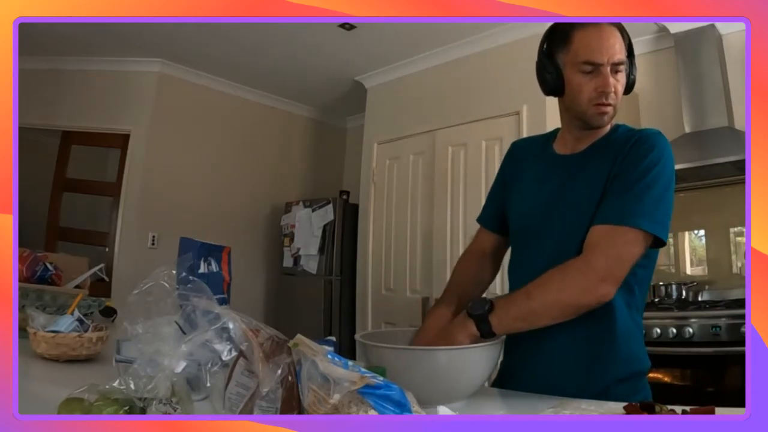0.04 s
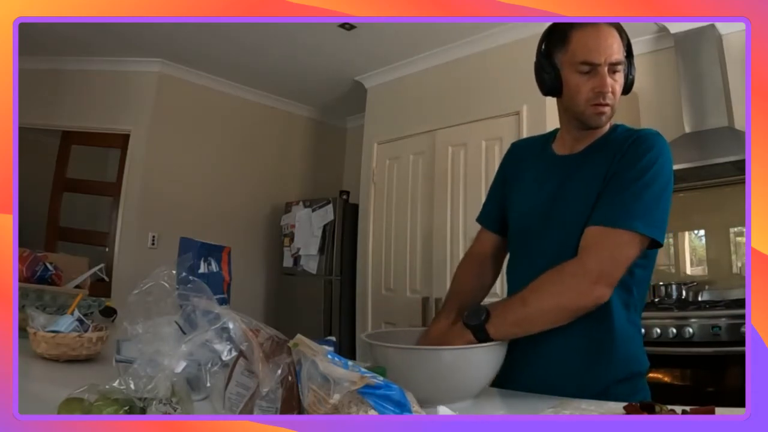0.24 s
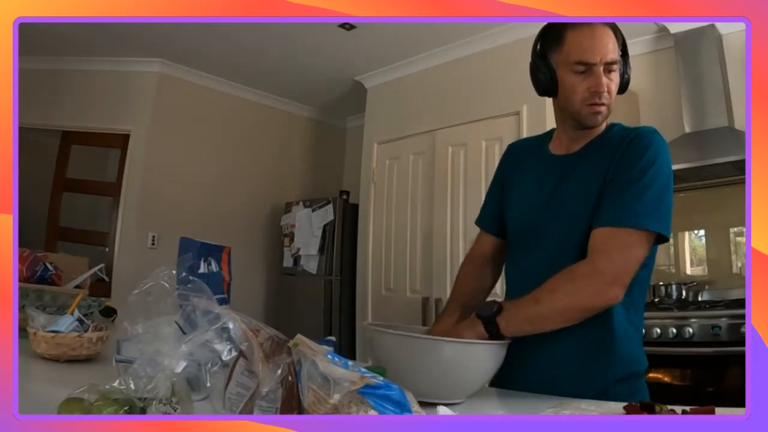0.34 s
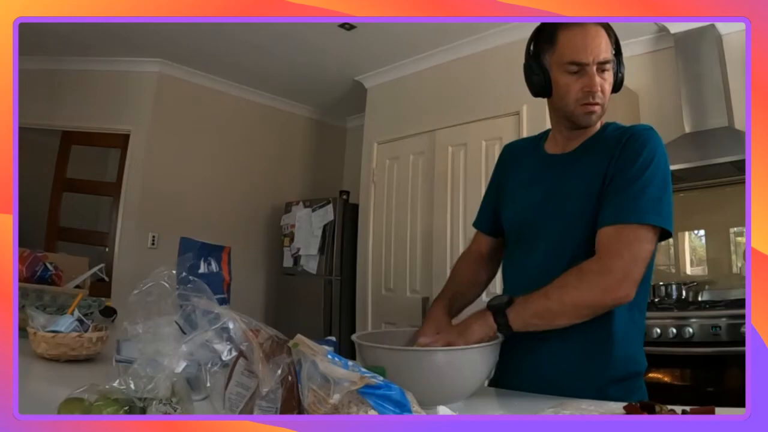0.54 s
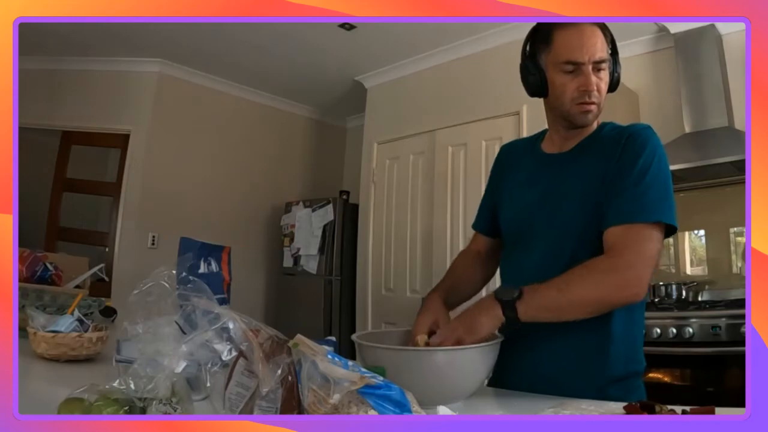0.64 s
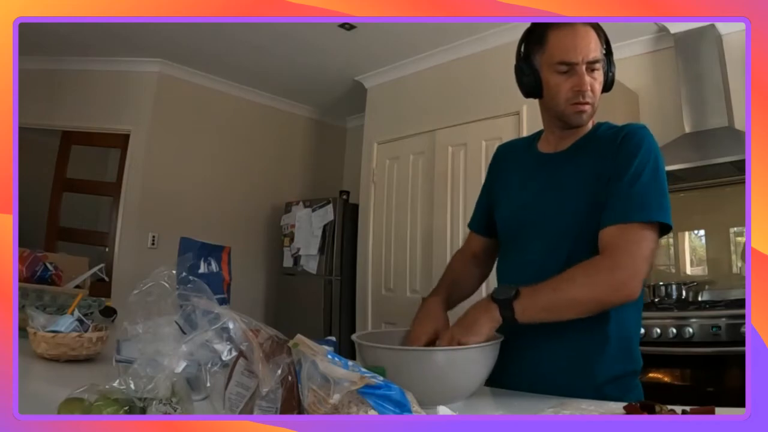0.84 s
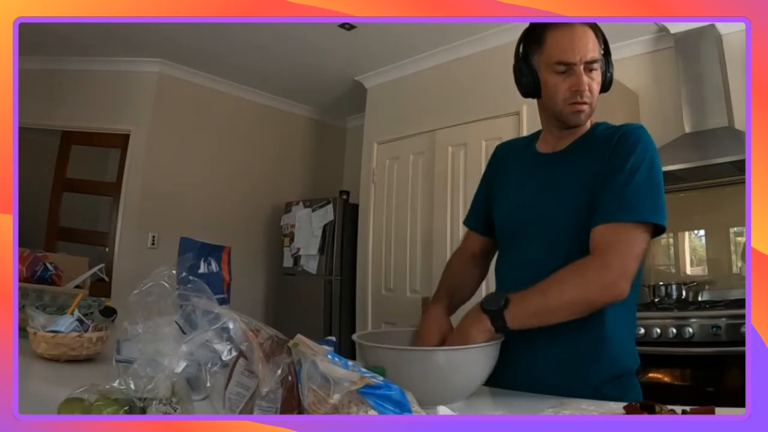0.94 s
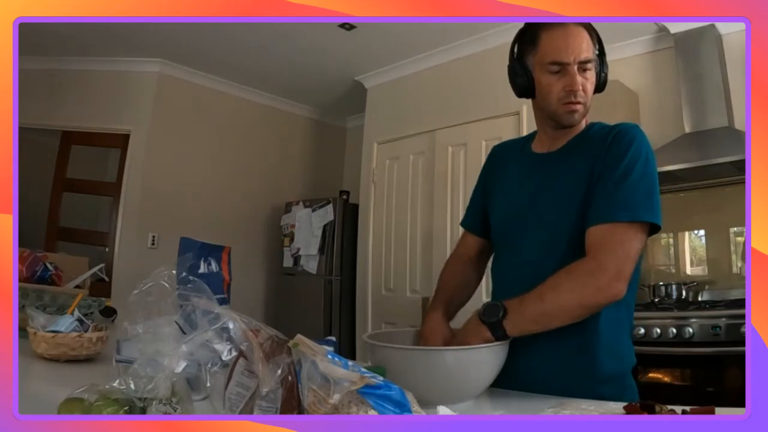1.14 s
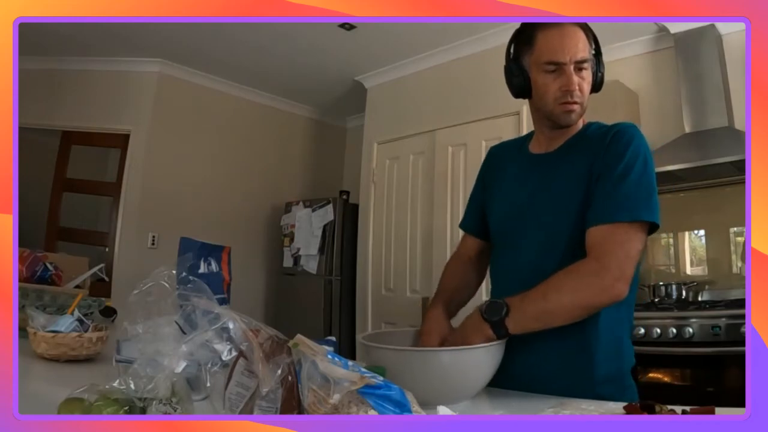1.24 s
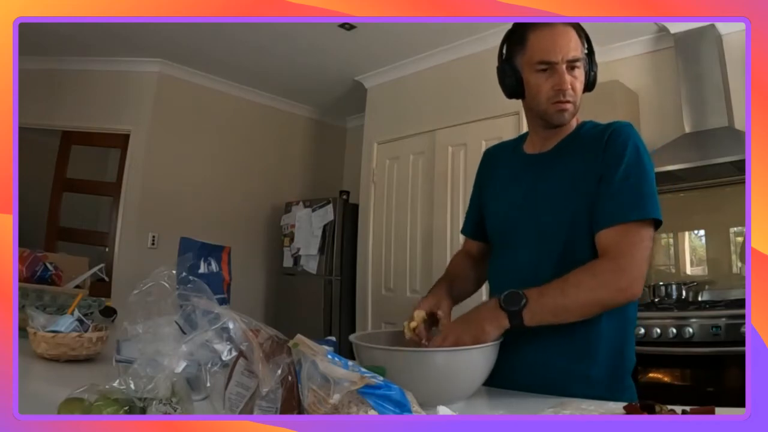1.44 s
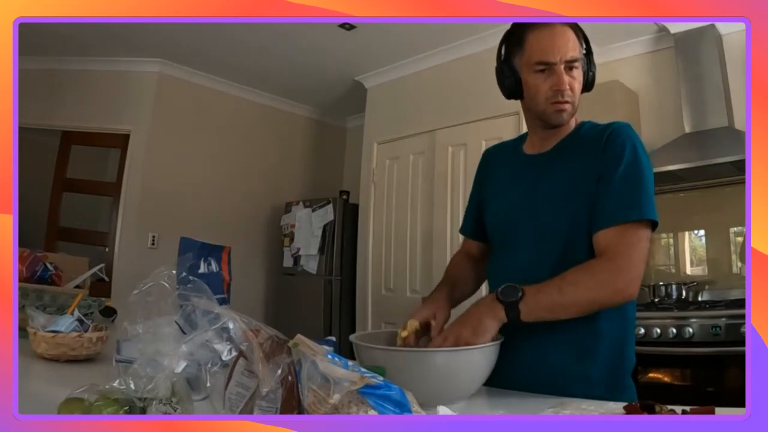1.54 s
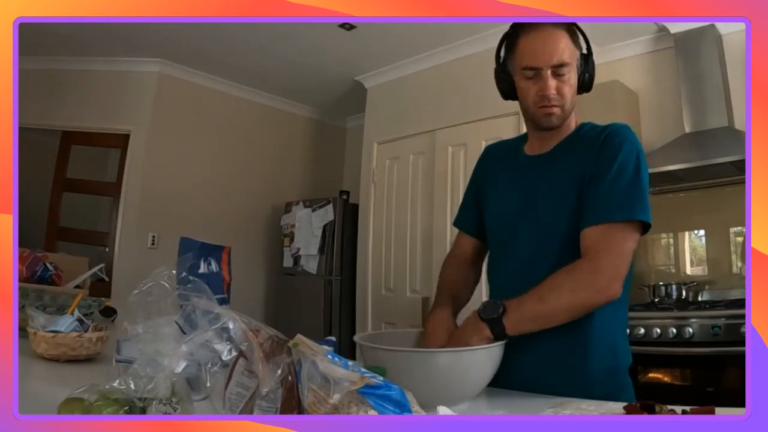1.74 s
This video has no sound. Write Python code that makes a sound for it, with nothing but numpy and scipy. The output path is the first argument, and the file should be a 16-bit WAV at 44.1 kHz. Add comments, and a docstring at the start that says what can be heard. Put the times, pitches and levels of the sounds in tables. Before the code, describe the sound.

A mixing bowl knocks on a kitchen counter while hands work dough. After a faint scrape, a woody thud lands at 0.23 seconds, then the loudest, sharp rattling knock at 0.39, slightly overloaded. A faint tap follows at 0.6, brief scrapes near 0.8 and 1.05, a dull damped thump at 1.13, and tiny taps and rubbing around 1.5. Hard-room reflections, low hum and hiss; narrow-band small microphone.

```python
"""A faint scrape is heard first, over hum and hiss; then hands work dough in a bowl on a kitchen counter.
The bowl knocks: a noise crack, damped modes of counter and cupboard, a low thump and a noisy rattle.
Fingers and bowl scrape faintly: random friction grains pass through broad resonances.
Decaying noise gives the hard room's reflections; appliance tones are narrowly filtered noise.
A small microphone a little way off has a narrow band and overloads on the hardest knock."""
import sys
import numpy as np
from scipy import signal
from scipy.fft import rfft, irfft
from scipy.io import wavfile
from scipy.ndimage import uniform_filter1d

SR = 44100
rng = np.random.default_rng(int(sys.argv[2]) if len(sys.argv) > 2 else 0)


def digitize_waveform(pressure):
    """Quantize a signal to 16-bit integers and store it at the path in sys.argv[1].

    Rows of a 2-D input are taken as channels; values are limited to [-1, 1].
    """
    field = np.atleast_2d(pressure).T
    bounded = np.clip(field, -1, 1)
    quanta = np.round(bounded * 32767).astype(np.int16)
    wavfile.write(sys.argv[1], SR, quanta)


def decibels_to_gain(level_db):
    """Convert a level in decibels to a linear amplitude gain (20 dB per decade)."""
    exponent = np.asarray(level_db, float) / 20
    return 10 ** exponent


N = 79380  # samples, 1.8 s

# Levels in all tables are those of the parts, before mixing and recording.
# Spectrum of room hum and microphone hiss: frequency_hz, relative_level_db
FLOOR_SPECTRUM = [(24, -66), (40, -30.5), (90, -6.5), (208, -1.5), (758, -9), (810, -24), (865, -9.5),
                  (1280, -13.5), (1630, -14), (3680, -18.5), (4020, -25), (6240, -11.5), (7600, -11),
                  (9880, -60), (16700, -120)]
# Wavering appliance tones: frequency_hz, width_hz (of each of two filter passes), level_db
HUM_TONES = [(140, 5.6, -74), (645, 18, -74), (980, 40, -71.5)]
# Decay time of the room's reflections: frequency_hz, t60_s
ROOM_DECAY = [(100, 0.19), (250, 0.5), (500, 0.64), (1000, 0.43), (2000, 0.56), (4000, 0.61), (7000, 0.63)]
# Strokes of fingers and bowl: start_s, stop_s, final_level_db, swell_db (negative fades),
# tilt_db_per_octave, bowl_tones_db
STROKES = [(-.06, 0.011, -49, -15, -2.5, -17), (0.324, 0.383, -41, 4.5, -4.5, -8.5),
           (0.767, 0.892, -42.5, 23, 0, -15), (0.996, 1.124, -52, 5.5, 4.5, -16.5),
           (1.5, 1.61, -58.5, 2, -4.5, -3)]
# Spectrum of the rubbing: frequency_hz, relative_level_db
RUB_SPECTRUM = [(300, -41), (1200, -24), (1700, -3), (2500, 0), (3400, -6.5), (4500, -10), (5500, -8),
                (6700, -1.5), (7500, -13.5)]
# Bowl tones under a stroke: frequency_hz, width_hz, relative_level_db
BOWL_TONES = [(1080, 73, -7.5), (1950, 200, -2), (3040, 150, -3)]
# Blows of the bowl on the counter: start_s, thud_db, thump_db, rattle_db, crack_db,
# thud_centre_hz, thud_rise_s, hand_damping_db_per_s (the thud takes only a share of it)
BLOWS = [(.234, -13, -19, -23, -36.5, 451, 0.0063, 4.5), (.292, -30, -35, -31, -46, 520, .008, 8),
         (0.348, -26, -31, -36.5, -60, 350, 0.031, 9.5), (0.3921, -9, -22, -12, -4.5, 763, .003, 6),
         (.61, -46, -65, -42.5, -48.5, 600, 0.0055, 5), (1.127, -18.5, -14.5, -30, -24, 505, 0.015, 75),
         (1.213, -37, -47.5, -57, -61, 560, 0.002, 30), (1.477, -45.5, -74, -64, -60, 543, 0.0051, 53),
         (1.492, -50, -59, -59, -66, 287, 0.0051, 78)]
# Modes of the counter and the cupboard under it: frequency_hz, relative_level_db, t60_s
COUNTER_MODES = [(128, -15.5, .3), (263.2, -5.5, .3), (308, -12, 0.42), (339.3, 3, .3), (390.6, -6, 0.23),
                 (396, -1.5, 0.26), (447.3, -1.5, 0.36), (521.2, -2, 0.4), (533.4, -2.5, 0.28),
                 (589.4, 0, 0.3), (620, -13, .35), (661.7, -2.5, 0.27), (778.6, -3.5, 0.17),
                 (969, -9, 0.24), (804, -12.5, 0.1), (1040, -5.5, 0.44)]
# Spectrum of the contact crack: frequency_hz, relative_level_db
CRACK_SPECTRUM = [(410, -28.5), (700, 9), (1010, -22.5), (1400, -1.5), (2430, 3), (3260, -6.5), (5190, -14),
                  (6380, -4), (7400, -23), (9620, -70.5), (16300, -120)]
# The counter's dense small resonances: frequency_hz, relative_level_db
RATTLE_SPECTRUM = [(60, -52), (120, -16), (300, -3.5), (600, -4), (950, 3), (1290, -12), (1600, -2.5),
                   (2400, -8.5), (3500, -19.5), (5000, -29), (6500, -30), (7400, -39.5)]
# Thin bowl modes in the rattle: frequency_hz, relative_level_db, t60_s
BOWL_MODES = [(1169, -9.5, 0.14), (1413, -8, 0.23), (1535, -16, .35), (1594, -8, 0.48), (1692, -5, .2),
              (1866, -13, 0.23)]


def evened(x):
    """Normalisation: scales a signal to an rms of 1."""
    return x / np.sqrt(np.mean(x ** 2) + 1e-20)


def read(points, hz):
    """Linear interpolation of a table on a log-frequency axis."""
    f, value = np.transpose(points)
    return np.interp(np.log(hz + 1), np.log(f + 1), value)


def add(mix, s, sound):
    """Superposition: sums a sound into the mix at time s, cutting what lies outside."""
    at = round(s * SR)
    sound = sound[max(-at, 0):]
    part = mix[max(at, 0):][:len(sound)]
    part += sound[:len(part)]


def shaped(x, level_db):
    """Linear filtering: weights the spectrum of x by a level at each frequency."""
    return irfft(rfft(x) * decibels_to_gain(level_db), len(x))


def coloured(points, size):
    """Spectral shaping: noise of rms 1 with the tabulated spectrum."""
    hz = np.fft.rfftfreq(size, 1 / SR)
    return evened(shaped(rng.standard_normal(size), read(points, hz)))


def resonate(x, hz, width):
    """Resonance: shifts a tone to zero frequency, smooths and shifts back, with a peak gain of 1."""
    turn = np.exp(2j * np.pi * hz * np.arange(len(x)) / SR)
    r = np.exp(-np.pi * width / SR)
    return 2 * (turn * signal.lfilter([1 - r], [1, -r], x / turn)).real


def dying(x):
    """Reverberant decay: each band of a steady noise dies exponentially at the room's rate."""
    hz, t, z = signal.stft(x, SR, nperseg=512, noverlap=384)
    z = z * decibels_to_gain(-60 * t / read(ROOM_DECAY, hz)[:, None])
    return signal.istft(z, SR, nperseg=512, noverlap=384)[1][:len(x)]


def room(x):
    """Diffuse reflection: convolves with a newly drawn dense tail that builds up after a gap."""
    gap_s, rise_s = 0.012, 0.011
    t = np.arange(SR * 3 // 4) / SR
    tail = dying(rng.standard_normal(len(t))) * np.clip((t - gap_s) / rise_s, 0, 1)
    return signal.fftconvolve(x, tail / np.linalg.norm(tail))


def kitchen():
    """Stationary noise: room hum and microphone hiss, slightly patchy in time and frequency."""
    level_db, patchy_db = -62, 1.8
    hz, t, z = signal.stft(coloured(FLOOR_SPECTRUM, N), SR, nperseg=1024, noverlap=768)
    patches = uniform_filter1d(rng.standard_normal(z.shape), 12, axis=0)
    patches = evened(uniform_filter1d(patches, 10, axis=1))
    noise = signal.istft(z * decibels_to_gain(patchy_db * patches), SR, nperseg=1024, noverlap=768)[1][:N]
    return decibels_to_gain(level_db) * noise


def hum():
    """Narrow-band noise: twice-filtered noise makes the faint fuzzy tones of kitchen appliances."""
    tones = np.zeros(N)
    for hz, width, db in HUM_TONES:
        tone = resonate(rng.standard_normal(N), hz, width)
        tones += decibels_to_gain(db) * evened(resonate(tone, hz, width))
    return tones


def scrape(start, stop, final_db, swell_db, tilt_db, tones_db):
    """Friction: fine grains swell or fade through the bowl's broad resonances and stop short."""
    grains_per_s, grain_db, onset_s = 9000, 1.5, 0.03
    swell_power, stop_db_per_s, room_db = 1.5, 600.5, -12.5
    t = np.arange(SR // 2) / SR
    hz = np.fft.rfftfreq(len(t), 1 / SR)
    present = rng.random(len(t)) < grains_per_s / SR
    grains = rng.standard_normal(len(t)) * present
    grains = grains * decibels_to_gain(grain_db * rng.exponential(1, len(t)))  # a few stronger grains

    tilt = tilt_db * np.log2(np.clip(hz, 500, 7500) / 2500)
    body = evened(shaped(grains, read(RUB_SPECTRUM, hz) + tilt))
    tones = sum(decibels_to_gain(db) * evened(resonate(grains, f, width)) for f, width, db in BOWL_TONES)

    left_s = stop - start - t
    swell = swell_db * abs(left_s / (stop - start)) ** swell_power
    level_db = final_db - np.where(left_s > 0, swell, -stop_db_per_s * left_s)
    stroke = (body + decibels_to_gain(tones_db) * tones) * decibels_to_gain(level_db) * np.minimum(t / onset_s, 1)
    sound = decibels_to_gain(room_db) * room(stroke)
    add(sound, 0, stroke)
    return start, sound


def counter_ring(t, thud_db, centre_hz):
    """Modal excitation: a blow drives the damped modes nearest its spectral centre most."""
    spread_db, phase_spread = 2.5, 0.33  # random per mode: dB, radians
    soft_db = 30  # a soft contact leaves out modes above its centre: dB per octave squared
    reach_octaves = 1.32 if thud_db > -36 else 0.3  # light taps wake only modes near their centre
    ring = np.zeros(len(t))
    for hz, db, t60 in COUNTER_MODES:
        level_luck, phase_luck = rng.standard_normal(2)
        octaves = np.log2(hz / centre_hz)
        level_db = db + spread_db * level_luck - 15 * (octaves / reach_octaves) ** 2
        level_db -= soft_db * max(octaves, 0) ** 2
        ring += decibels_to_gain(level_db - 60 * t / t60) * np.sin(2 * np.pi * hz * t + phase_spread * phase_luck)
    return ring / np.sqrt(np.mean(ring[:2000] ** 2))


def counter_thud(t, thud_db, thump_db, centre_hz, rise_s):
    """Forced vibration: counter modes, their room reflections and a low thump swell together."""
    push_s, room_db = 0.011, -7.5
    thump_hz, thump_t60_s = 227.5, 0.2
    ring = counter_ring(t, thud_db, centre_hz)
    filled = room(ring * np.exp(-t / push_s))[:len(t)]  # the early push drives the room
    filled = decibels_to_gain(room_db) * filled / np.sqrt(np.mean(filled[500:2500] ** 2))
    thump = decibels_to_gain(thump_db - 60 * t / thump_t60_s) * np.sin(2 * np.pi * thump_hz * t)
    rise = 1 - np.exp(-(t / rise_s) ** 2)
    return rise * (decibels_to_gain(thud_db) * (ring + filled) + thump)


def counter_rattle(t):
    """High modal density: small resonances act as decaying noise, with thin bowl modes added."""
    rise_s = 0.0046
    modes = np.zeros(len(t))
    for hz, db, t60 in BOWL_MODES:
        modes += decibels_to_gain(db - 60 * t / t60) * np.sin(2 * np.pi * (hz * t + rng.random()))
    return (dying(coloured(RATTLE_SPECTRUM, len(t))) + modes) * (1 - np.exp(-t / rise_s))


def contact_crack(t):
    """Impulsive contact: a very short noise burst and its reflections in the room."""
    decay_s, attack_s, room_db = 0.0033, 0.0002, -5.5
    early = t[:2048]
    snap = coloured(CRACK_SPECTRUM, 2048) * np.exp(-early / decay_s) * np.minimum(early / attack_s, 1)
    crack = decibels_to_gain(room_db) * room(snap)[:len(t)]
    add(crack, 0, snap)
    return crack


def knock(start, thud_db, thump_db, rattle_db, crack_db, centre_hz, rise_s, damp_db):
    """Impact: a short crack, then thud and rattle swell, fill the room and are damped by the hands."""
    thud_damp_share = 0.44
    early_db, early_s = 2, 0.017  # the direct blow stands above its ring
    bend_db, bend_s = 6.5, 0.28  # the tails bend downward late: bend_db lost by bend_s
    t = np.arange(SR * 3 // 4) / SR
    thud = counter_thud(t, thud_db, thump_db, centre_hz, rise_s)
    thud = thud * decibels_to_gain(-thud_damp_share * damp_db * t)
    treble = decibels_to_gain(rattle_db) * counter_rattle(t) + decibels_to_gain(crack_db) * contact_crack(t)
    treble = treble * decibels_to_gain(-damp_db * t)
    envelope_db = early_db * np.exp(-(t / early_s) ** 2) - bend_db * (t / bend_s) ** 4
    return start, (thud + treble) * decibels_to_gain(envelope_db)


def scene():
    """Superposition of sources: scrapes and knocks over the kitchen's noise and hum."""
    mix = kitchen() + hum()
    for stroke in STROKES:
        add(mix, *scrape(*stroke))
    for blow in BLOWS:
        add(mix, *knock(*blow))
    return mix[None]


def top_cut(x):
    """Nothing passes above the cut-off."""
    return signal.sosfilt(signal.butter(12, 8170, fs=SR, output="sos"), x)


def record(dry):
    """Band limitation and overload: a narrow-band microphone clips whatever exceeds its ceiling."""
    low_hz, edge_hz, gain_db, ceiling = 97, 7244, 0.41, 1.0
    high_pass = signal.butter(3, low_hz, "high", fs=SR, output="sos")
    low_pass = signal.firwin(401, edge_hz, window=("kaiser", 10), fs=SR)
    heard = signal.sosfilt(high_pass, dry)
    heard = signal.oaconvolve(heard, low_pass[None], "same")
    finished = np.clip(decibels_to_gain(gain_db) * heard, -ceiling, ceiling)
    return top_cut(finished)


dry = scene()
out = record(dry)
digitize_waveform(out)
```